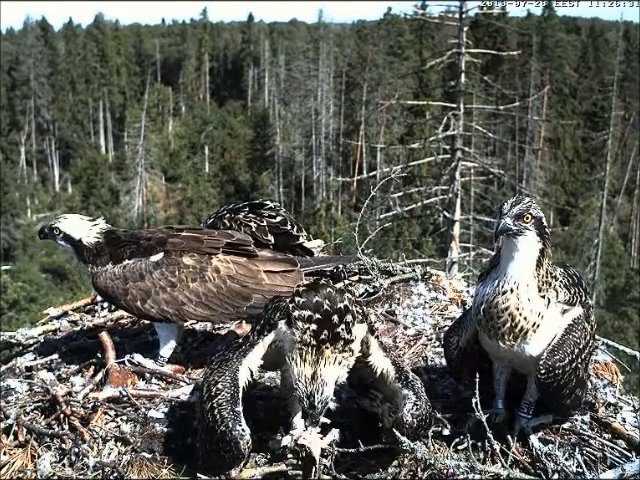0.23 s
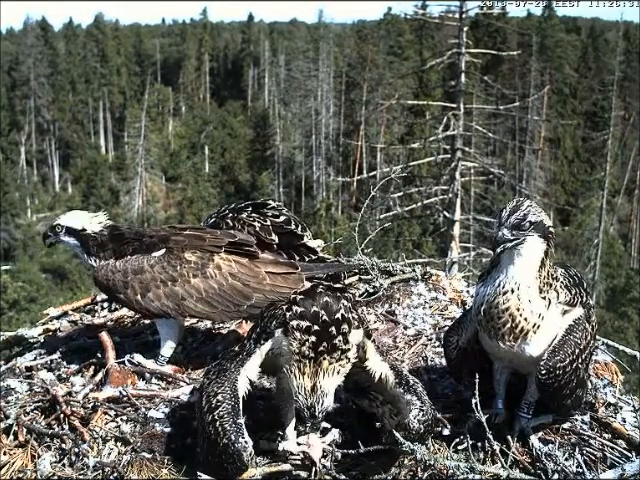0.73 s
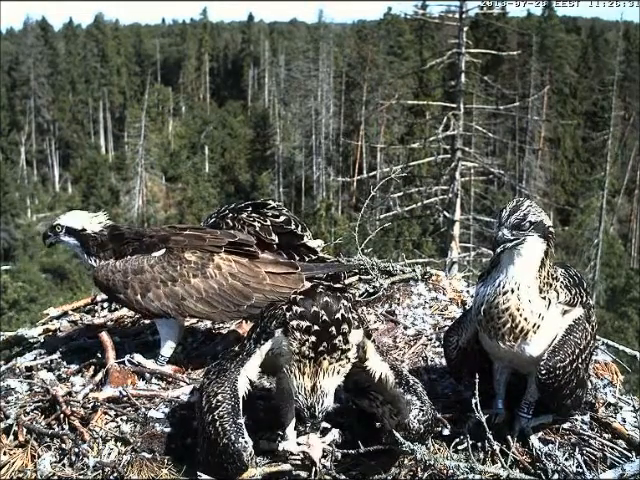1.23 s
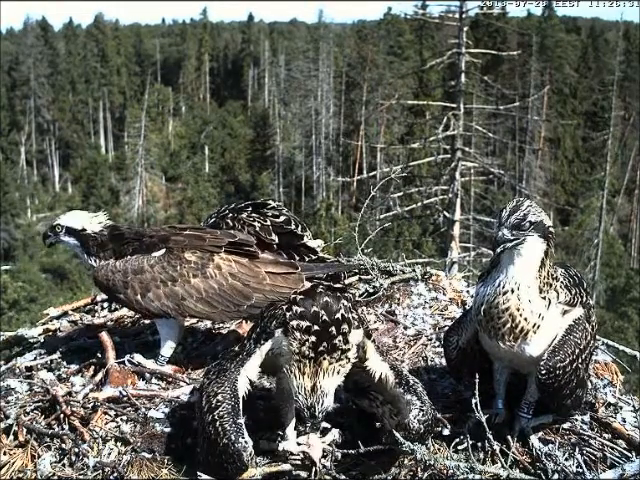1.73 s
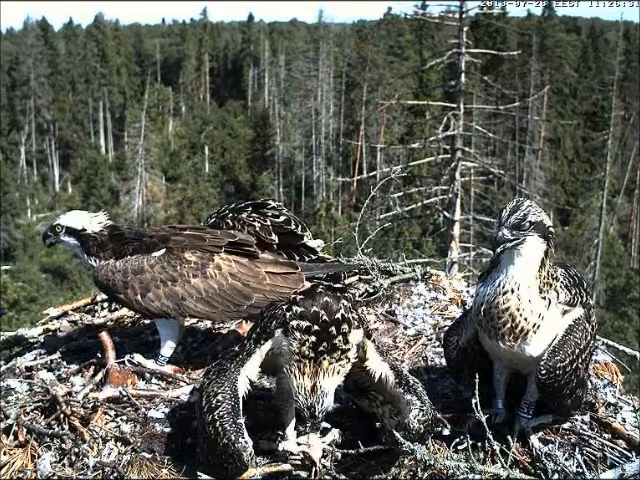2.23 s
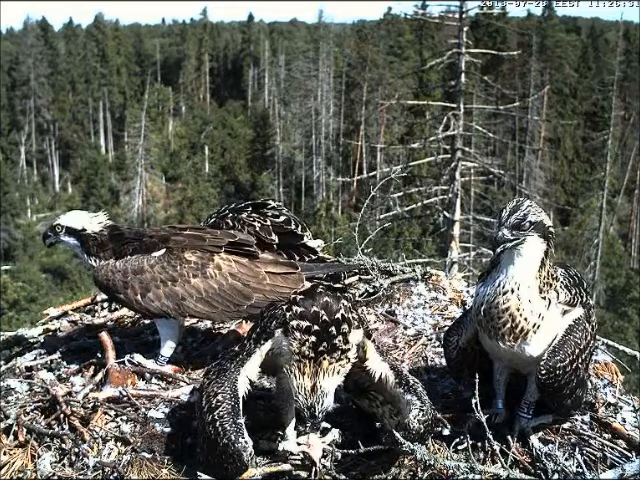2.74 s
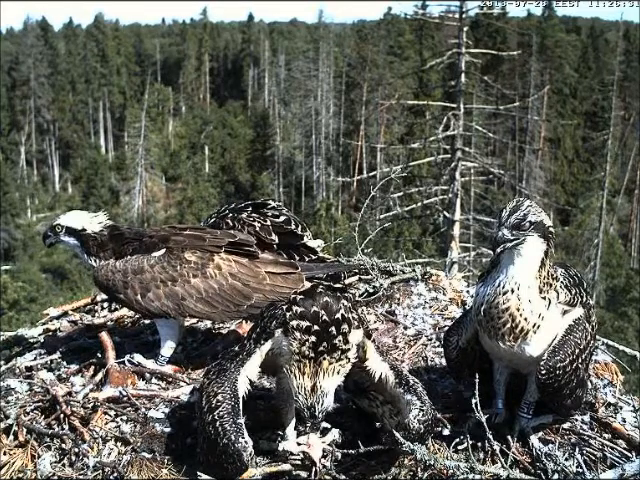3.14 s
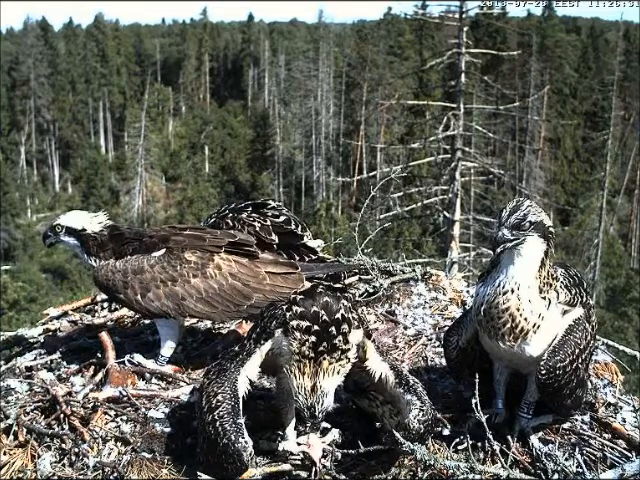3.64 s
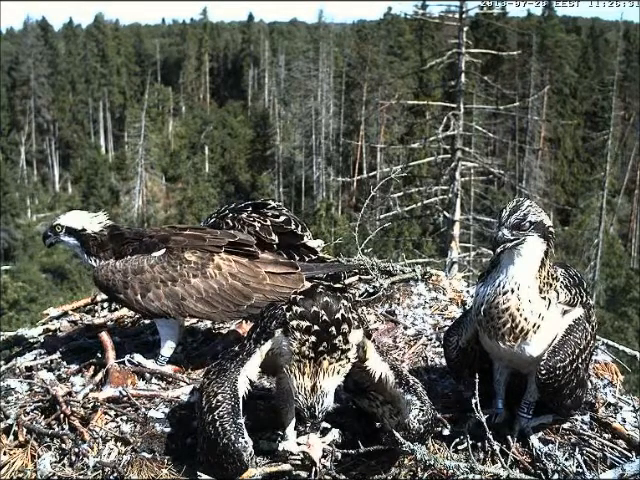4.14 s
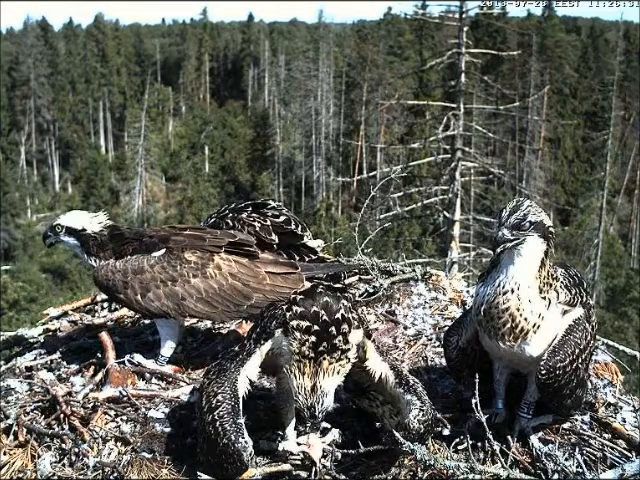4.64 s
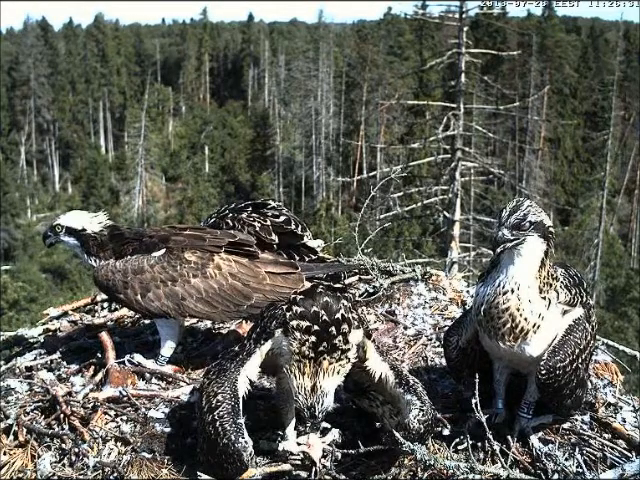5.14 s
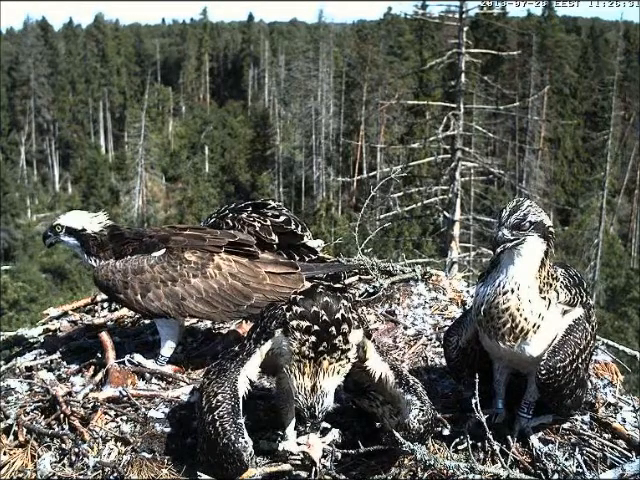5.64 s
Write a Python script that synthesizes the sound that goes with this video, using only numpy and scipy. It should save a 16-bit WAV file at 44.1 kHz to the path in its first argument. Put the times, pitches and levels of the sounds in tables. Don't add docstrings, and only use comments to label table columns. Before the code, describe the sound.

Thin piping osprey calls, about one every seven tenths of a second, over close machine hum, whirring air and soft rattling clunks.

```python
import sys
import numpy as np
from scipy import signal
from scipy.io import wavfile
from scipy.ndimage import uniform_filter1d

SR = 44100
rng = np.random.default_rng(int(sys.argv[2]) if len(sys.argv) > 2 else 0)


def gain_from_decibels(decibels):
    exponent = np.asarray(decibels, float) / 20
    return 10 ** exponent


def put_to_file(sound):
    columns = np.atleast_2d(sound).T
    safe = np.clip(columns, -1, 1)
    whole_steps = np.round(safe * 32767)
    wavfile.write(sys.argv[1], SR, whole_steps.astype(np.int16))


N = 259440


def evened(x):
    return x / np.sqrt(np.mean(x ** 2) + 1e-20)


def drift(low_hz, top_hz, count):
    hz = np.geomspace(low_hz, top_hz, 12)[:, None]
    t = np.arange(0, N + 256, 256) / SR
    start = rng.random((count, len(hz), 1))
    slow = (np.sin(2 * np.pi * (hz * t + start)) / np.sqrt(hz)).sum(axis=1)
    return np.array([np.interp(np.arange(N) / SR, t, evened(row)) for row in slow])


def ring(modes, rise_s):
    t = np.arange(SR // 6) / SR
    x = sum(gain_from_decibels(db - 60 * t / t60) * np.sin(2 * np.pi * hz * t) for hz, db, t60 in modes)
    return x * (1 - np.exp(-t / rise_s))


def add(mix, s, sound):
    part = mix[round(s * SR):][:len(sound)]
    part += sound[:len(part)]


# frequency in Hz, density in dB per Hz.
AIR_SPECTRUM = [(10, -2), (25, 0), (60, -2), (110, -6), (150, -8), (220, -8), (320, -11.5), (410, -5.5),
                (520, -13.5), (620, -8), (800, -6), (900, -8.5), (1050, -10.5), (1400, -10.5)]
# frequency in Hz, density in dB per Hz.
HISS_SPECTRUM = [(1400, -11), (1900, -12.5), (2150, -19), (2600, -22), (3400, -25), (4200, -25.5),
                 (4700, -25.5), (5400, -25), (6000, -25), (7500, -26.5), (10000, -26), (12500, -25),
                 (15500, -20.5)]
# frequency in Hz, width in Hz, level in dB.
FUZZY_WHINES = [(116.6, 1, -64), (4220, 150, -72), (5110, 90, -73), (6390, 40, -75), (12055, 50, -72)]


def air_and_hiss():
    hz = np.fft.rfftfreq(2048, 1 / SR)
    spectrum_hz, spectrum_db = np.transpose(AIR_SPECTRUM + HISS_SPECTRUM[1:])
    spectrum_db = np.interp(np.log(hz + 1), np.log(spectrum_hz), spectrum_db)
    real, imaginary, patches = rng.standard_normal((N // 512 + 5, len(hz), 3)).T
    patches = uniform_filter1d(patches, size=10, axis=0)
    patches = evened(uniform_filter1d(patches, size=6, axis=1))
    patchy_db = (1.14 / (1 + (hz / 2500) ** 2))[:, None] * patches
    z = (real + 1j * imaginary) * gain_from_decibels(spectrum_db[:, None] + patchy_db)
    x = gain_from_decibels(-41.5) * evened(signal.istft(z, nperseg=2048, noverlap=1536)[1][:N])
    t = np.arange(N) / SR
    for whine_hz, width_hz, db in FUZZY_WHINES:
        r = np.exp(-np.pi * width_hz / SR)
        grain = rng.standard_normal(N) + 1j * rng.standard_normal(N)
        slow = signal.lfilter([1], [1, -2 * r, r * r], grain)
        x += gain_from_decibels(db) * evened((slow * np.exp(2j * np.pi * whine_hz * t)).real)
    return x


def motor(shaft_hz, orders, wander, waver_db):
    turns = np.cumsum(shaft_hz * (1 + wander * drift(0.1485, 3.23, count=1)[0])) / SR
    waver = waver_db * drift(0.145, 5.4, count=len(orders))
    start = np.transpose(orders)[0] ** 2 * .234
    x = np.zeros(N)
    for (multiple, db), w, turn in zip(orders, waver, start):
        x += gain_from_decibels(db + 3 + w) * np.sin(2 * np.pi * (multiple * turns + turn))
    return x


# multiple of the shaft speed, level in dB.
FAN_ORDERS = [(1, -52), (4, -60), (9, -66), (10, -60), (11, -63), (12, -72), (13, -62), (15, -60),
              (16, -59), (17, -59), (18, -62), (19, -56), (20, -55), (21, -44), (22, -62), (24, -67),
              (25, -56), (26, -57), (27, -63), (28, -62), (29, -61), (35, -71), (39, -71)]


def fan():
    return motor(38.32, FAN_ORDERS, wander=.0006, waver_db=.9)


# multiple of the shaft speed, level in dB.
SPINDLE_ORDERS = [(1, -35.5), (2, -63), (9, -51), (10, -71), (12, -57.5), (18, -61)]


def spindle():
    return motor(89.99, SPINDLE_ORDERS, wander=.00003, waver_db=-0.23)


# frequency in Hz, level in dB, t60 in seconds.
TICK_MODES = [(5600, -54, .008), (11260, -48, .012), (11900, -53, .012), (12380, -53, .01)]


def refresh():
    refresh_hz = 59.86
    at = np.arange(int(N / SR * refresh_hz)) / refresh_hz + .0062
    at = np.round(at * SR).astype(int)
    train, gate = np.zeros(N), np.zeros(N)
    train[at] = 1
    ticks = signal.oaconvolve(train, ring(TICK_MODES, rise_s=.0004))[:N]
    gate[at[1::3] - 100] = gain_from_decibels(1.3 * rng.standard_normal(len(at[1::3])))
    burst = signal.windows.hann(round(0.011 * SR))
    band = signal.butter(2, [5200, 5850], "bandpass", fs=SR, output="sos")
    chatter = evened(signal.sosfilt(band, rng.standard_normal(N)))
    chatter *= signal.oaconvolve(gate, burst)[:N]
    return ticks + gain_from_decibels(-57.5) * chatter


# start in seconds, rattle level in dB, thud level in dB.
ARM_STOPS = [(0.594, -29, -37.5), (0.624, -27, -41), (0.862, -30, -54), (0.873, -28, -32),
             (2.306, -24, -36), (2.3465, -26, -38), (2.861, -24, -35.5), (2.8727, -26, -54),
             (3.4838, -25, -41), (3.5149, -28, -36.5), (4.197, -28.5, -40), (4.2191, -23, -43),
             (4.863, -25, -57), (4.8736, -27, -32.5), (4.8865, -39, -46)]
# frequency in Hz, level in dB, t60 in seconds.
CASE_MODES = [(320, -11, .03), (560, -7, .05), (820, -3, .03), (1010, 0, .03), (1190, 0, .025),
              (1450, -5, .018), (1900, -14, .01)]
# frequency in Hz, level in dB, t60 in seconds.
FRAME_MODES = [(140, 4.5, 0.13), (264, -8, 0.092)]


def arm():
    out = np.zeros(N)
    chance = rng.standard_normal((len(ARM_STOPS), 400))
    rattle = ring(CASE_MODES, rise_s=.0012)
    thud = ring(FRAME_MODES, rise_s=0.0053)
    for (s, rattle_db, thud_db), jolts in zip(ARM_STOPS, chance):
        blows = np.r_[1, .04 * jolts ** 3 * np.exp(-np.arange(400) / 90.0)]
        shaken = np.convolve(rattle, blows)
        add(out, s, gain_from_decibels(rattle_db) * shaken / abs(shaken).max())
        add(out, s + 0.0025, gain_from_decibels(thud_db + 3.0) * thud / abs(thud).max())
    return out


# start in seconds, level in dB.
TWIG_SNAPS = [
    (3.198, -50),
    (3.618, -51),
]


def twigs():
    out = np.zeros(N)
    band = signal.butter(2, [3800, 6500], "bandpass", fs=SR, output="sos")
    for (s, db), grit in zip(TWIG_SNAPS, rng.standard_normal((len(TWIG_SNAPS), 600))):
        add(out, s, gain_from_decibels(db) * evened(signal.sosfilt(band, grit)) * np.exp(-np.arange(600) / 186.0))
    return out


def undervoice(opening, undertone, tail):
    s, length, db, first_hz, last_hz = opening
    hum_s, hum_db, hum_hz = undertone
    fall, first_db, last_db, low_hz = tail
    onset_s, handover_s, tail_rise_s, tail_fall_s = .011, .01197, .008, .012
    faint_db, sag_db, creep_hz_per_s = -62, -3.5, 1800
    onset_hz = first_hz + (last_hz - first_hz) * (onset_s / length) ** .8
    handed, landed = s + length + handover_s, fall + tail_fall_s
    handed_hz = last_hz + creep_hz_per_s * handover_s
    ebb = min(.06, (fall - hum_s) / 2)
    return [(s, db - 21, first_hz),
            (s + onset_s, db, onset_hz),
            (s + length, db + sag_db, last_hz),
            (handed, db + sag_db - 14, handed_hz),
            ((handed + hum_s) / 2, faint_db, (handed_hz + hum_hz) / 2),
            (hum_s, hum_db, hum_hz),
            (hum_s + ebb, faint_db, hum_hz + creep_hz_per_s * ebb),
            (fall - tail_rise_s, faint_db, 2230),
            (fall, first_db, 1890),
            (landed, last_db, low_hz),
            (landed + tail_rise_s, faint_db, low_hz)]


# start in seconds, length in seconds, level in dB, first pitch in Hz, last pitch in Hz.
RISING_NOTES = [(0.382, 0.063, -31, 1780, 2055), (1.087, 0.054, -31, 1777, 2040),
                (1.731, 0.041, -36, 1790, 2090), (2.463, 0.042, -34.5, 1805, 2050),
                (3.322, .052, -36, 1820, 2106), (4.01, 0.045, -37, 1765, 1960),
                (4.832, .024, -42.5, 1770, 1940)]
# time in seconds, level in dB, pitch in Hz.
HUMS = [(.555, -61, 2380), (1.235, -54, 2230), (1.81, -50, 2105), (2.68, -57, 2800), (3.425, -54, 2330),
        (4.245, -53, 2400), (5.075, -52, 2300)]
# time in seconds, first level in dB, last level in dB, last pitch in Hz.
FALLING_TAILS = [(.678, -41, -51, 1620), (1.354, -43, -52, 1620), (2.03, -45, -49, 1440),
                 (2.79, -41, -46, 1400), (3.632, -40, -37, 1330), (4.286, -44, -45, 1480),
                 (5.12, -55, -56, 1700)]


def lower_calls():
    return [undervoice(*rows) for rows in zip(RISING_NOTES, HUMS, FALLING_TAILS)]


# time in seconds, width in seconds, pitch drop in Hz, level change in dB.
SLACK_MOMENTS = [(.53, 0.02, 25, 1), (.625, .03, 21, 1.5), (1.29, 0.043, -2, -4),
                 (1.835, 0.038, 101.5, 3.5), (2.555, 0.011, -15, -4.5), (2.61, .03, 25.5, -0.5),
                 (4.1, 0.024, 26, 0), (4.141, 0.032, -1, -4.5), (4.935, .03, 0, -3.5),
                 (4.995, 0.041, 57, -1.5)]


def whistle(start, length, open_db, mid_db, close_db, open_hz, top_hz, climb, close_hz):
    attack_s, release_s, droop_s = .015, .012, .036
    t = np.arange(0, length, .001)
    u, left = t / length, length - t
    db = open_db + (close_db - open_db) * u + (2 * mid_db - open_db - close_db) * 2 * u * (1 - u)
    db += -37 * (np.maximum(1 - t / attack_s, 0) ** 2 + np.maximum(1 - left / release_s, 0))
    hz = open_hz + (top_hz - open_hz) * np.sin(np.pi / 2 * np.minimum(u / climb, 1)) ** .8
    hz += (close_hz - top_hz) * np.clip(1 - (left - release_s) / droop_s, 0, 1) ** 1.4
    for s, width, drop_hz, change_db in SLACK_MOMENTS:
        slack = np.exp(-((start + t - s) / width) ** 2)
        hz = hz - drop_hz * slack
        db = db + change_db * slack
    return np.transpose([start + t, db, hz])


# start in seconds, length in seconds, opening level in dB, middle level in dB, closing level in dB.
WHISTLE_LEVELS = [(0.441, 0.25, -30.5, -33, -31.5), (1.133, .233, -33, -31, -33),
                  (1.762, .279, -38, -45.5, -34.5), (2.498, 0.3, -31, -34.5, -38.5),
                  (3.362, 0.28, -38, -40, -33.5), (4.055, 0.24, -34.5, -34, -35.5),
                  (4.861, 0.273, -38.5, -36, -35)]
# opening pitch in Hz, top pitch in Hz, share of the call spent climbing (0-1), closing pitch in Hz.
WHISTLE_PITCHES = [(2745, 2940, .5, 2780), (2750, 2955, 0.9, 2860), (2790, 3115, .6, 2880),
                   (2728, 2978, .65, 2945), (2835, 3097, .48, 2980), (2695, 2942, .8, 2880),
                   (2687, 2872, .32, 2807)]


def upper_calls():
    return [whistle(*levels, *pitch) for levels, pitch in zip(WHISTLE_LEVELS, WHISTLE_PITCHES)]


def voice(calls, flutter_db):
    t, height = np.arange(N) / SR, np.zeros(N)
    for rows in calls:
        s, db, _ = np.transpose(rows)
        height += gain_from_decibels(np.interp(t, s, db, -120, -120))
    s, _, hz = np.concatenate(calls).T
    faint = 1 / (1 + (height / gain_from_decibels(-53)) ** 2)
    tremble, flutter = drift(12, 70, count=2)
    hz = uniform_filter1d(np.interp(t, s, hz), size=160) * (1 + (.0012 + .006 * faint) * tremble)
    height = uniform_filter1d(height, size=100) * gain_from_decibels((0.43 + flutter_db * faint) * flutter)
    return np.sqrt(2) * height, 2 * np.pi * np.cumsum(hz) / SR


# start in seconds, length in seconds, level of the half-pitch line in dB.
HALF_PITCH = [
    (2.64, .08, -53),
    (3.56, .065, -49.5),
]


def bird():
    high, high_phase = voice(upper_calls(), flutter_db=.7)
    low, low_phase = voice(lower_calls(), flutter_db=3.)
    x = high * np.sin(high_phase) + low * np.sin(low_phase)
    overtone = gain_from_decibels(6) * low ** 2 * np.sin(2 * low_phase)
    mixing = gain_from_decibels(24) * high ** 2 * low ** .5 * np.sin(2 * high_phase - low_phase)
    x += signal.lfilter(*signal.iirpeak(3600, 10, SR), overtone + mixing)
    for s, length, db in HALF_PITCH:
        at = slice(round(s * SR), round((s + length) * SR))
        swell = signal.windows.tukey(at.stop - at.start, .4)
        x[at] += gain_from_decibels(db + 7.5) * np.sin(high_phase[at] / 2) * swell
    band = signal.butter(2, [2200, 2900], "bandpass", fs=SR, output="sos")
    rush = signal.sosfilt(band, rng.standard_normal(N))
    high_hz = np.gradient(high_phase) * SR / (2 * np.pi)
    strain = np.clip((high_hz - 2900) / 150, 0, 1)
    x += gain_from_decibels(-20.5) * high * strain * evened(rush)
    return x - 0.69 * signal.lfilter(*signal.iirpeak(3030, 45, SR), x)


def scene():
    mono = air_and_hiss() + fan() + spindle() + refresh() + arm() + twigs() + bird()
    treble = signal.butter(3, 7000, "highpass", fs=SR)
    side = gain_from_decibels(-63.2) * evened(signal.lfilter(*treble, rng.standard_normal(N)))
    return np.array([mono + side, mono - side])


def masked(x, below_db):
    hz, _, z = signal.stft(x, SR, nperseg=1024, noverlap=768)
    power = uniform_filter1d(abs(z[0] + z[1]) ** 2, size=4, axis=0)
    power = uniform_filter1d(power, size=7, axis=1)
    loudest = power[(hz > 2600) & (hz < 3200)].max(axis=0)
    above = (hz > 3120) & (hz < 3420)
    drop = above[:, None] & (power < loudest * gain_from_decibels(-2 * below_db))
    return signal.istft(z * np.where(drop, .12, 1), SR, nperseg=1024, noverlap=768)[1][:, :N]


def band_limit(x):
    return signal.sosfilt(signal.butter(12, 17080, fs=SR, output="sos"), x)


def record(dry):
    edge = signal.firwin(511, 15790, window=("kaiser", 9), fs=SR)
    limited = signal.oaconvolve(masked(dry, below_db=35.5), edge[None], "same")
    return band_limit(limited)


dry = scene()
out = record(dry)
put_to_file(out)
```